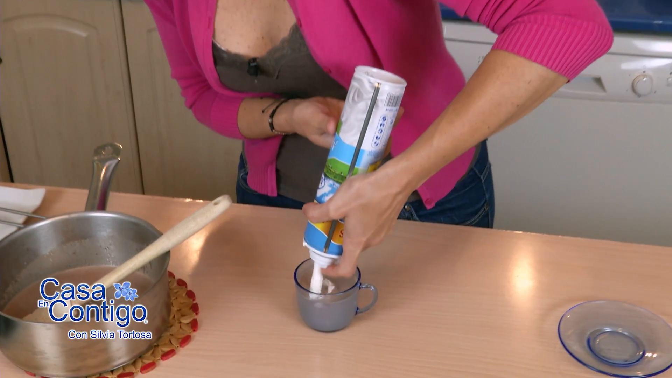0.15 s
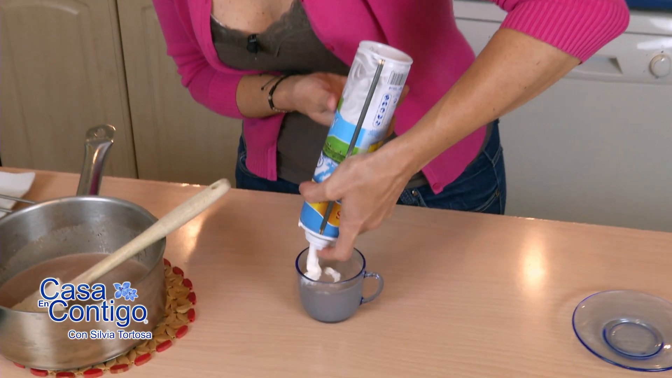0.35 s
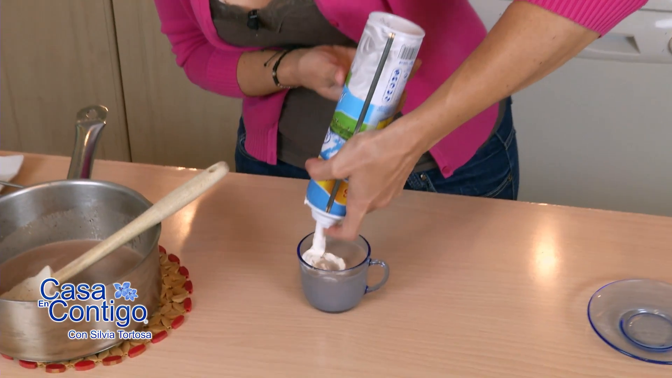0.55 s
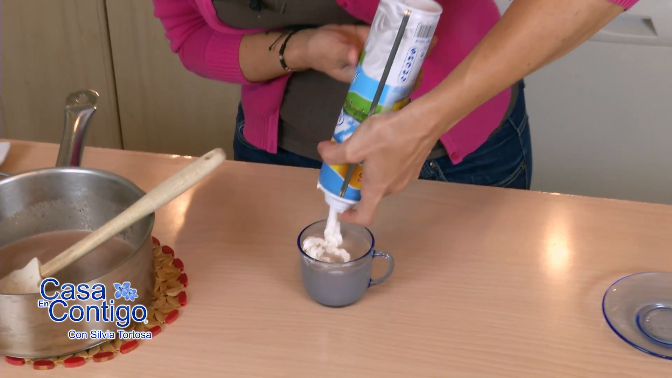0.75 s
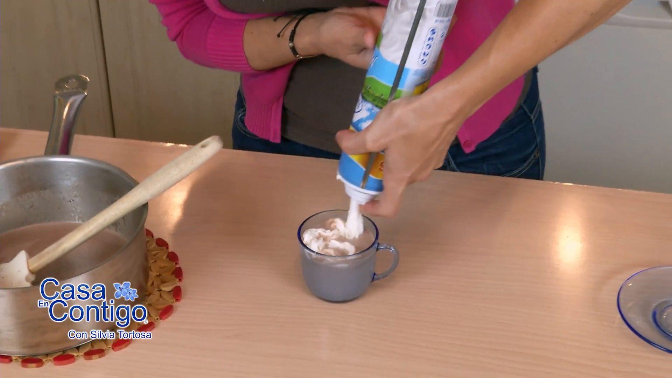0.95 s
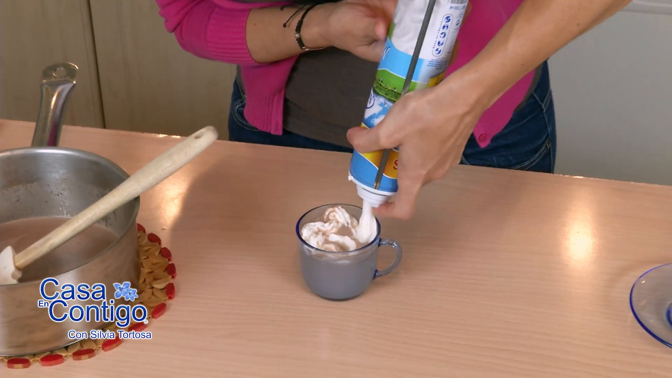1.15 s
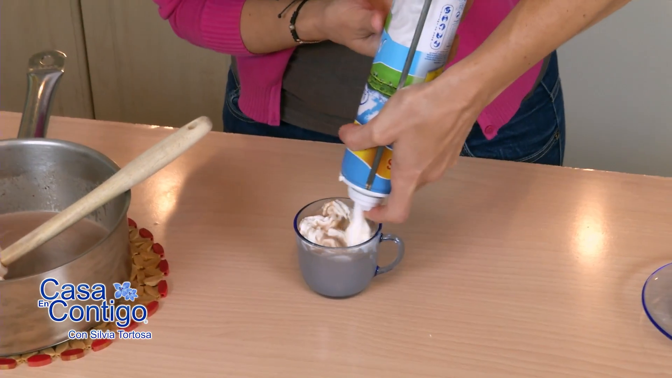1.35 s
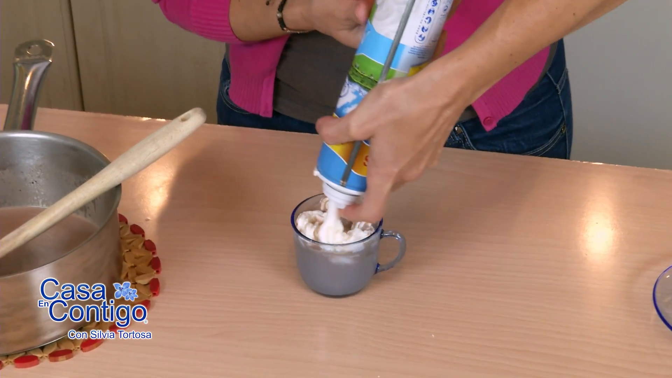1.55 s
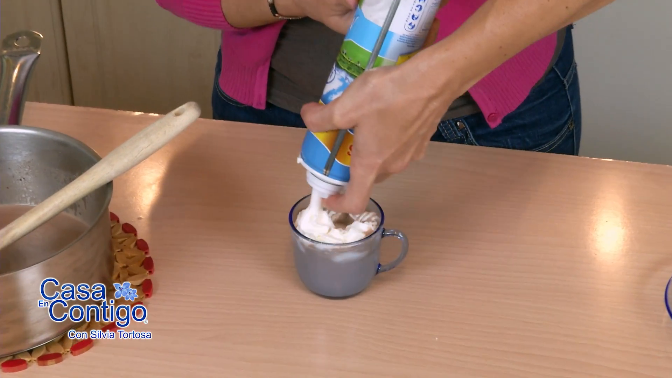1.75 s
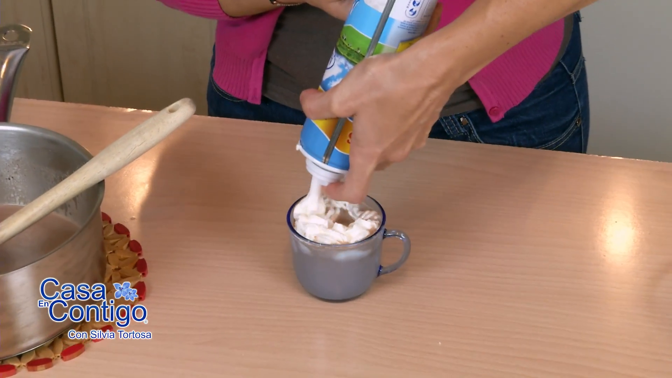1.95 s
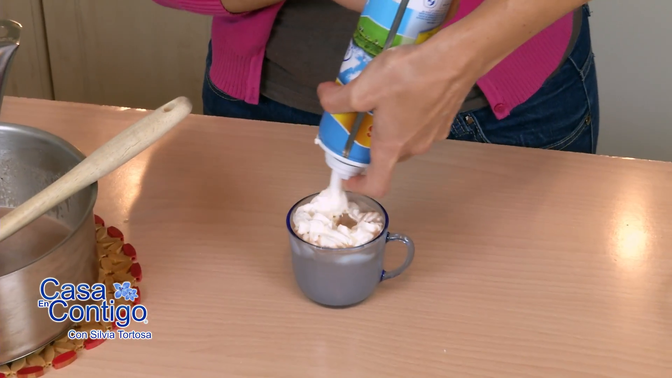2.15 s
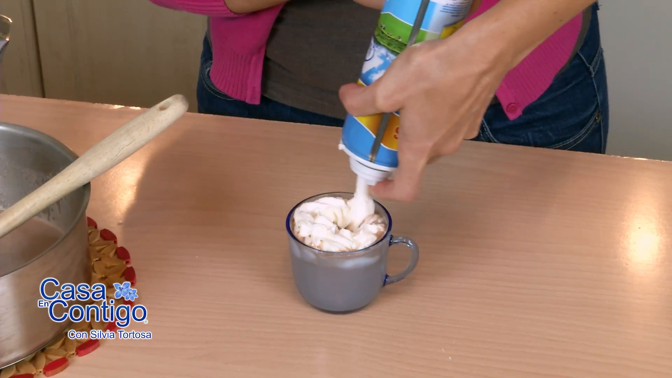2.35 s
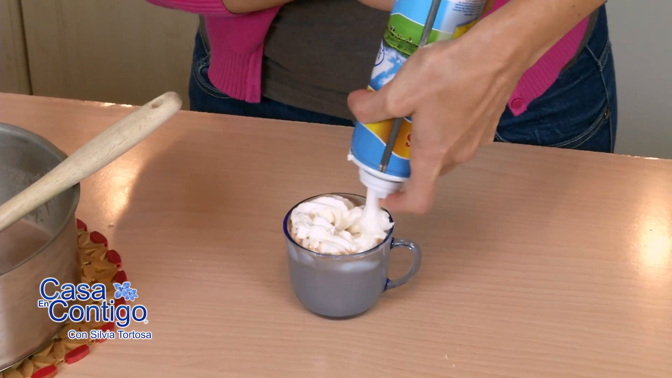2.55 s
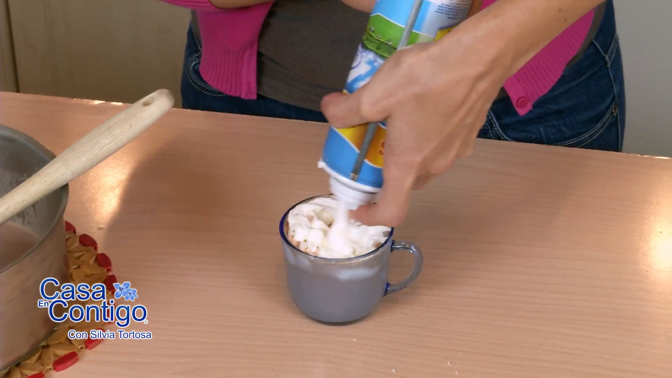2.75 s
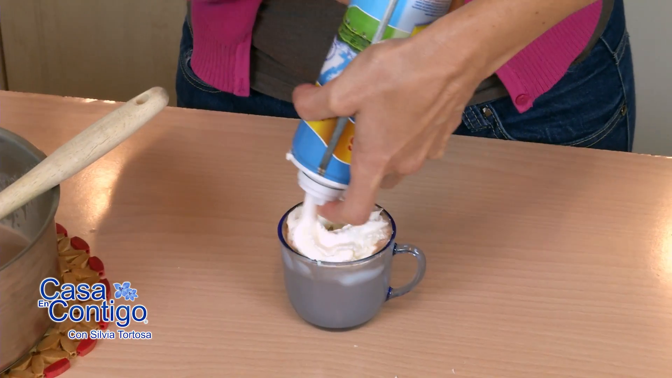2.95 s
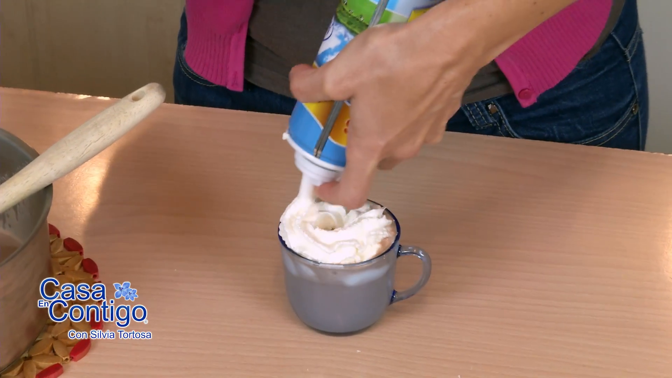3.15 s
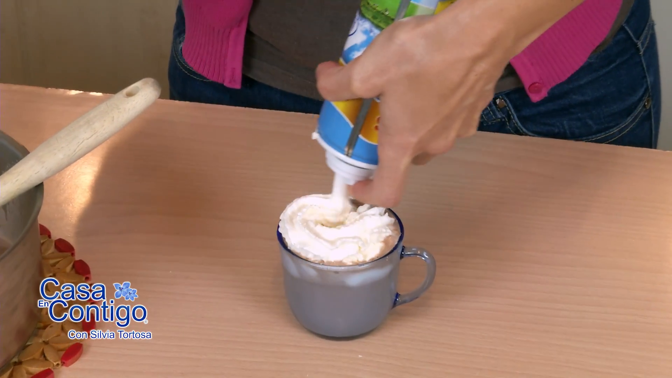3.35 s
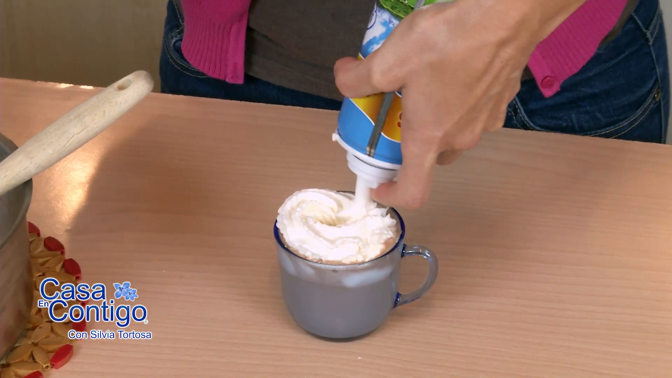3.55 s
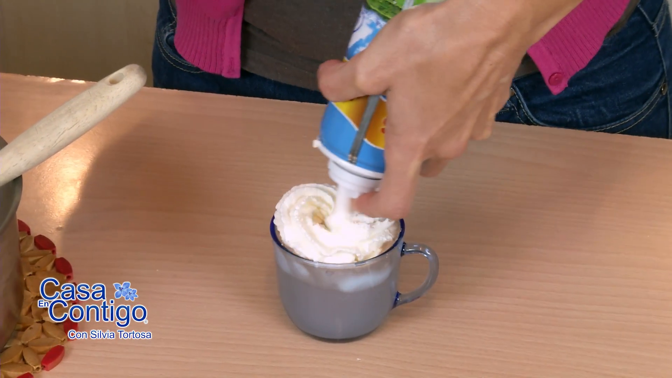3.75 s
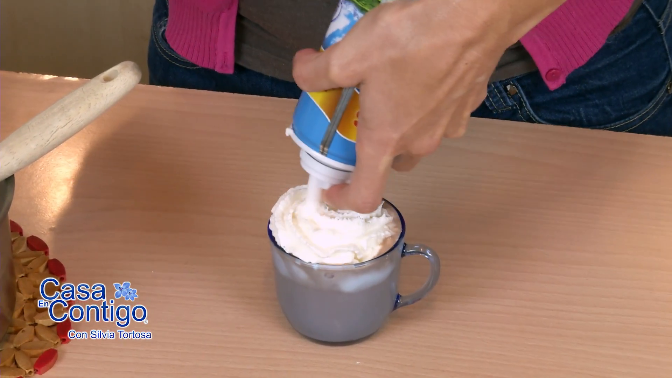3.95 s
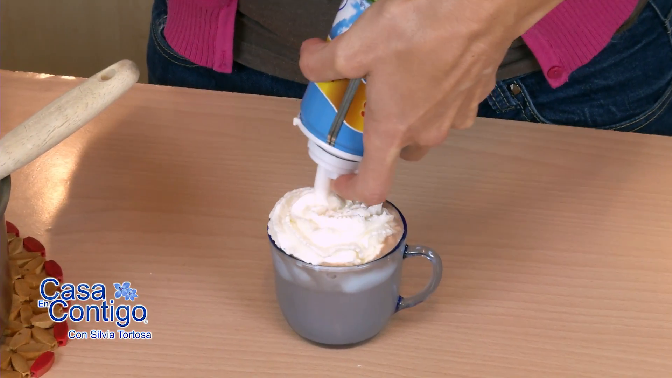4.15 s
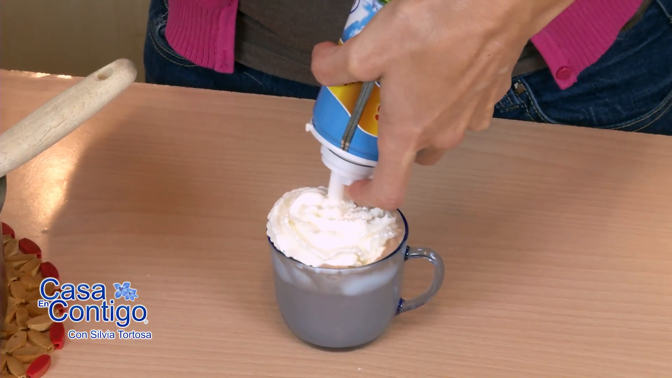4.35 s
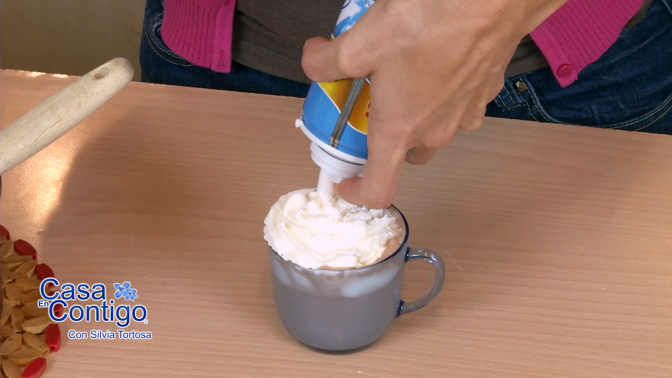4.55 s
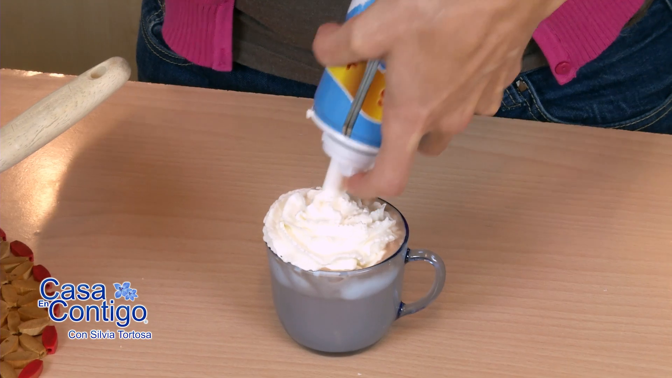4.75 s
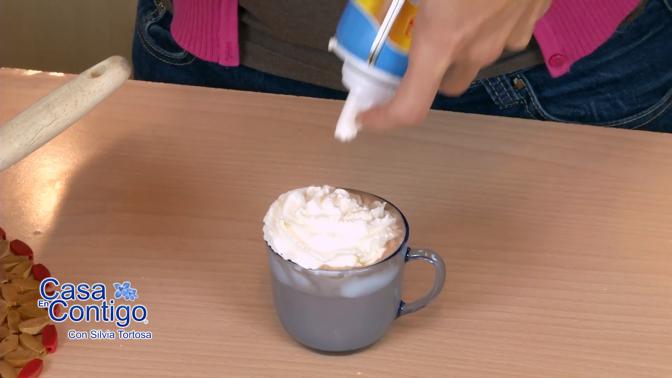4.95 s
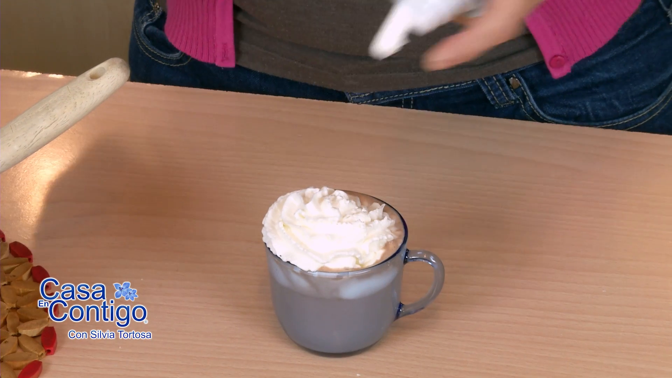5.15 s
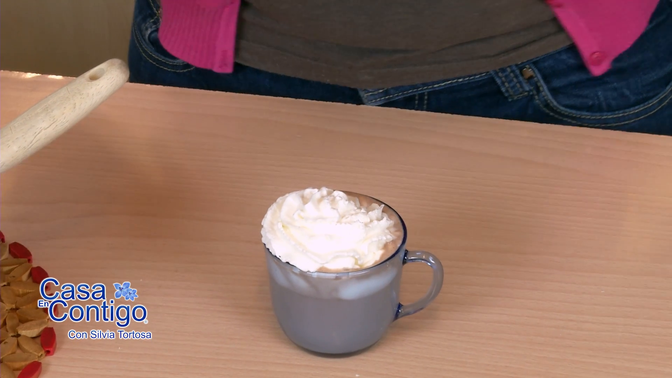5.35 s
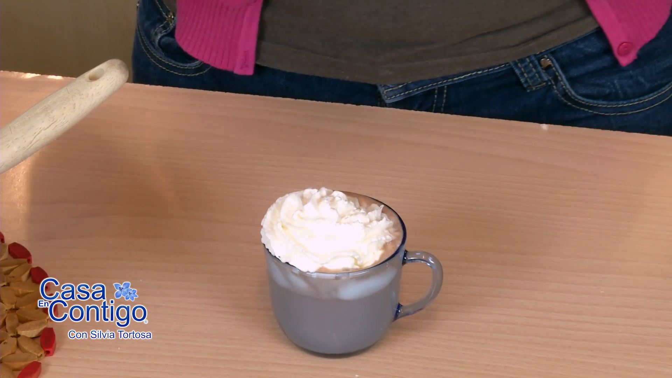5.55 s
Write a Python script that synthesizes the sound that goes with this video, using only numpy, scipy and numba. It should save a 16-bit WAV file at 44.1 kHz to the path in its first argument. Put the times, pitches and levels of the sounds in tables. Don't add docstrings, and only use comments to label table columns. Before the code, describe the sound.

A bright, bubbly, uneven gas hiss starts immediately and runs almost throughout, broken into fast spurts by foam bursting in the nozzle, with hollow metallic and ceramic-like ringing beneath. It cuts off sharply, leaving quiet kitchen air with a low fridge-like rumble, sharp little handling clicks, a small metallic knock with a low bump, and soft knit cloth swishes. Close microphone, short indoor reverberation.

```python
import sys
import numpy as np
from scipy import signal
from scipy.fft import rfft, irfft
from scipy.io import wavfile
from scipy.ndimage import uniform_filter1d
from numba import njit

SR = 44100
rng = np.random.default_rng(int(sys.argv[2]) if len(sys.argv) > 2 else 0)


def attenuation_scalar(level_db):
    decades = np.asarray(level_db, float) / 20
    return 10 ** decades


def master(y):
    cut = np.clip(np.atleast_2d(y).T, -1, 1)
    pcm = np.round(cut * 32767)
    wavfile.write(sys.argv[1], SR, pcm.astype(np.int16))


N = 246342
T = np.arange(N) / SR
SHUT_S = 4.718
LAST_GASP_S = .1
RING_SHARE = .75


def unit(x):
    return x / np.sqrt(np.mean(x ** 2))


def noise(count=N):
    return rng.standard_normal(count)


def band(x, lo_hz, hi_hz, order=2):
    edges_hz = [lo_hz, min(hi_hz, .45 * SR)]
    return signal.sosfilt(signal.butter(order, edges_hz, "band", fs=SR, output="sos"), x)


def colour(x, points):
    hz, db = np.transpose(points)
    f = np.maximum(np.arange(len(x) // 2 + 1) * SR / len(x), 1)
    return irfft(rfft(x) * attenuation_scalar(np.interp(np.log(f), np.log(hz), db)), len(x))


@njit
def svf(x, hz, width):
    y, b, l = np.empty(len(x)), 0., 0.
    for i in range(len(x)):
        g, k = np.tan(np.pi * hz[i] / SR), width / hz[i]
        v = (b + g * (x[i] - l)) / (1 + g * (g + k))
        b, l, y[i] = 2 * v - b, l + 2 * g * v, k * v
    return y


def resonance(x, hz, width_hz):
    return svf(x, np.full(len(x), float(hz)), float(width_hz))


def walk(rate):
    k = int(SR / rate)
    held = np.repeat(noise(N // k + 1), k)
    return 0.63 * uniform_filter1d(uniform_filter1d(held, k), k)[:N]


def air():
    # f/Hz, level/dB per Hz
    tone = [(8.8, -43), (15, -8), (97, -4), (767, -20), (1150, -20), (3600, -28), (4540, -23),
            (12200, -24.5), (15900, -27)]
    throb_db = 2.5 * np.cos(2 * np.pi * 5.02 * (T - 5.12))
    rumble = attenuation_scalar(-60.5 + walk(5.3) + throb_db) * unit(band(noise(), 17, 66))
    fade_db = 19 * np.maximum(T - 5.45, 0)
    return attenuation_scalar(-62.5 + 0.52 * walk(3.7) - fade_db) * unit(colour(noise(), tone)) + rumble


def room(x):
    t60_s, low_db = 0.38, -6.5
    treble_t60_s, treble_db = 0.34, -7.5
    u = T[:SR // 2]
    build = (1 - np.exp(-u / 0.007)) / np.sqrt(SR / 30)
    out = attenuation_scalar(0.5) * resonance(x, 351.6, 3)
    for turn in range(3):
        low = attenuation_scalar(low_db) * band(noise(len(u)), 43, 2700) * 1000 ** (-u / t60_s)
        high = attenuation_scalar(treble_db) * band(noise(len(u)), 1960, 16000, order=1) * 1000 ** (-u / treble_t60_s)
        share = np.cos(2 * np.pi * (1.322 + turn) * T + turn)
        out = out + signal.fftconvolve(x * share, (low + high) * build)[:N]
    return out


def sleeve():
    # middle t/s, length/s, f/Hz, level/dB
    strokes = [
        (5.132, 0.094, 7100, -59.5),
        (5.25, 0.15, 2150, -61),
        (5.28, 0.22, 11000, -67.5),
        (5.3, 0.56, 14000, -69),
        (5.484, 0.23, 890, -63.5),
        (5.44, 0.45, 230, -65.5),
    ]
    out = 0
    for s, length, hz, db in strokes:
        cloth = resonance(resonance(noise(), hz, 1.3 * hz), hz, 1.3 * hz)
        swell = np.exp(-np.abs(2 * (T - s) / length) ** 3)
        out = out + unit(cloth) * attenuation_scalar(db + 2.5 * walk(80)) * swell
    return out


def ticks():
    # t/s, peak level/dB, ring f/Hz, crack level/dB, crack f/Hz
    taps = [(4.742, -45, 2470, -83, 6000), (4.901, -53, 1210, -57, 1790), (4.9509, -37.5, 2340, -56, 14100),
            (4.9512, -59, 5560, -60, 1400), (5.0089, -44, 9000, -53, 1200), (5.009, -45, 14500, -60, 12000),
            (4.9511, -54, 7800, -60, 12200), (5.221, -56, 2400, -60, 6000), (5.0116, -50, 1150, -62, 900),
            (5.096, -51, 1190, -66, 3000), (5.2707, -62, 1500, -61, 2800), (5.3038, -49, 850, -58, 2500),
            (5.406, -52, 4140, -58, 4500), (5.457, -52, 750, -60, 1500), (5.498, -64, 3000, -66, 5000),
            (5.481, -47, 1260, -60, 1500)]
    # t/s, peak level/dB, f/Hz, t60/s
    pings = [
        (4.9511, -47, 14300, .012),
        (4.9509, -50, 5400, .006),
        (5.2678, -54, 14800, .012),
        (5.2708, -48, 14600, .006),
        (5.3045, -53, 14800, .01),
        (5.2706, -40, 2400, .012),
        (5.2708, -42, 3200, .012),
        (5.2706, -46, 900, .014),
        (5.2707, -44, 1950, .008),
    ]
    # f/Hz, level/dB, t60/s
    thud_modes = [
        (150, -37.5, 0.039),
        (98, -50, 0.055),
        (254, -43, 0.05),
    ]
    out, u = np.zeros(N), T[:3000]

    def sine(hz):
        return np.sin(2 * np.pi * hz * u)

    def add(s, sound):
        out[int(s * SR):int(s * SR) + len(u)] += sound

    for s, db, hz, crack_db, crack_hz in taps:
        decay = 1000 ** (-u * hz / 20)
        ring = decay * (sine(hz) + .5 * sine(0.45 * hz) + 0.17 * sine(1.38 * hz))
        grit = noise(len(u))
        bright = np.exp(-u / .0015) * unit(band(grit, .92 * crack_hz, 1.1 * crack_hz))
        add(s, attenuation_scalar(db) * ring + attenuation_scalar(crack_db) * (bright + .6 * np.exp(-u / .0006) * grit))
    for s, db, hz, t60 in pings:
        add(s, attenuation_scalar(db) * 1000 ** (-u / t60) * sine(hz))
    for hz, db, t60 in thud_modes:
        add(5.272, -attenuation_scalar(db) * 1000 ** (-u / t60) * sine(hz))
    return out


def pockets():
    # t/s, gurgle rise level/dB, nozzle rise level/dB, jet rise level/dB
    listed = [(0.0605, 10, 12, 9), (0.1257, 4, 7.5, 3), (0.149, 5, 9.5, 4), (0.167, 6, 10, 6),
              (0.1843, 5, 10, 5.0), (0.201, 5, 6.0, 4), (0.21, 4, 9, 2), (0.2484, 3, 6, 3.5),
              (0.2752, 5.0, 10.5, 7), (0.2854, 4.0, 9.0, 3.5), (0.3352, 4, 7, 6.5), (0.3687, 4, 3, 4.0),
              (0.3817, 4.5, 5, 7.5), (0.398, 4.0, 7.5, 7), (0.4685, -9, 3.5, 3), (0.486, 4, 4, 3),
              (0.5617, 1, 4, 5.0), (0.5767, 4, 3, 6), (0.5852, 8, 3, 7), (0.599, 6, 4.0, 6), (0.628, 2, 2, 4),
              (0.6595, 4.5, 6.5, 5.5), (0.7063, 7.0, 4, 4), (0.7206, 10, 3.5, 8.5), (0.7525, 5, 0, 4),
              (0.7754, 5, 4.5, 5.5), (0.7877, -3, 1, 7), (0.8057, 4.5, -3, 7), (0.885, 5, 4, 1),
              (0.8996, 6, 3, 4.5), (0.9155, 7, 3, 7.5), (0.9903, 5.5, 1, 7.5), (1.0358, 7.5, 5, 6.5),
              (1.065, 4.5, 6.5, 7), (1.1453, 4, 6, 6.5), (1.1565, 5.0, 6, 6), (1.171, 1, 6.0, 5.5),
              (1.21, 4.5, 8, 7), (1.3365, 5.5, 5, 5), (1.3719, 4, 5, 6.0), (1.3844, 7.5, 4, 6),
              (1.4254, 7.5, 4.5, 7), (1.4991, 5, 2, 3), (1.5452, 1, 4.5, 4.5), (1.618, 8, 9, 4.0),
              (1.6338, 3.0, 7, 2), (1.673, 5, 7.5, 4), (1.6856, 3, 5, 4), (1.7182, 5, 9, 3),
              (1.7311, 7, 6, 6),
              (1.746, 4, 10, 4), (1.7575, 2, 6, 4), (1.809, 6, 10.5, 8.5), (1.821, 5, 5, 6.5),
            (1.836, 6, 9, 6), (1.8527, -2, 5, 7), (1.865, 6.5, 4, 7), (1.899, 2, 5.5, 5.5),
            (1.913, 6.5, 3, 6.5), (2.0286, 4.5, 7, 9), (2.058, 3, 3, 5), (2.0934, 7, 7.0, 6.0),
            (2.143, 5, 6, 5), (2.166, 6.5, 8.5, 8.5), (2.228, 3, 8.5, 6.5), (2.2408, 6.5, 7, 8),
            (2.2698, 6, 6, 6.5), (2.279, 5, 2, 7), (2.3106, 6.5, 1, 9), (2.3631, 7.5, 0, 8.5),
            (2.3798, 8, 6, 6.5), (2.409, 7, 5, 6), (2.4288, 7, 9.5, 9), (2.4617, 4.5, 4, 3),
            (2.4776, -2, 4.5, 5), (2.5612, 4.5, 5, 4.0), (2.6167, 5.5, 6.5, 4), (2.649, 4, 6.5, 7.0),
            (2.6795, 2, 5.5, 7.5), (2.7388, 3, 4, 1), (2.7702, 4.5, 9, 8), (2.7986, 2, 7.5, 6.0),
            (2.828, 3, 7, 6), (2.8475, -5, 8, 2), (2.891, 6.5, 6.5, 1), (2.909, 4, 5.5, 6.5),
            (2.9876, 6, 5.5, 5), (3.0318, 6, 6, 7), (3.0842, 3.5, 7, 2), (3.1006, 10, 8.5, 7.5),
            (3.1337, 10.5, 12, 4), (3.168, 12.5, 12, 5.5), (3.1987, 9, 6, 5), (3.215, 6.5, 10.5, 7),
            (3.2344, 7, 8.0, 5), (3.2605, 5, 9.5, 4), (3.2844, 5.5, 7, 4), (3.3163, 5.5, 5, 6),
            (3.3357, 9, 11, 8), (3.3687, 11.5, 10, 9.5),
              (3.39, 6.5, 4, 6.5), (3.408, 8, 10.5, 4), (3.4362, 7.5, 13, 7.5), (3.465, 7, 8, 4),
            (3.475, 5.5, 6, 5), (3.4926, -4, 11.5, 3.5), (3.542, 4, 10, 2), (3.5592, 5, 11.5, 4),
            (3.5765, 0, 10, 4.5), (3.5928, 4.5, 5, 5), (3.6125, 4, 9.5, 2), (3.705, 2, 5, 5),
            (3.7415, -3, 12, 1), (3.7749, 3, 7, 4.5), (3.793, -4, 10.5, 3), (3.8228, 3, 8.5, 3),
            (3.8407, -6, 8, 6), (3.859, 0, 9, 6.5), (3.876, 3, 13, 7.5), (3.9076, 3.5, 7.0, 7),
            (3.9232, 3, 7.5, 5.5), (3.957, 4.5, 6.5, 4), (4.0056, 2, 5, 5.5), (4.0178, 7, 9.5, 6.0),
            (4.035, 6, 11, 9), (4.078, 6, 10, 7), (4.1204, 4.5, 11.5, 8), (4.1376, 5.5, 10, 5.0),
            (4.151, 4, 10, 6), (4.169, 3, 12, 6), (4.185, 4, 9, 1), (4.2129, 2.5, 12, 4),
            (4.2495, 2, 11.5, 2.0), (4.2634, 3, 7.5, 3), (4.2793, 4.5, 11, 5.5), (4.3007, -4, 9.5, 2),
            (4.3559, 4.5, 9, 4.5), (4.3979, 7, 8.5, 3.5), (4.413, 5, 11.5, 5.5), (4.4484, 1, 5, 3.5),
            (4.4653, 6.5, 14, 5), (4.4803, 2, 2, 6), (4.5107, 4, 10, 6), (4.5323, 2, 10, 6.5),
            (4.5456, 2, 7, 6), (4.617, 4, 11, 10), (4.6325, 4.5, 6, 7), (4.638, 0, 10.5, 7),
            (4.6506, 4, 7, 9), (4.6705, 6, 10, 11.5), (4.689, 0, -2, 8.5), (4.694, 3, 10.5, 10),
              (0.024, 5.5, 2.0, 5), (0.0778, 7.5, 4, -5), (0.1058, 1, 5.5, 1), (0.1373, 6.0, 4.5, 2),
            (0.2295, 4.5, 1, 2.0), (0.3148, -4, 3, 1.0), (0.649, 2, 3, 4), (0.6695, 3, 2, 4.0),
            (0.8336, -4, 2, 5.5), (0.845, 1, 4.5, 2), (0.859, 2, 3, 4), (0.9557, 5.5, 0, 5),
            (1.116, 3, 3, 4), (1.1289, 4.5, 2.0, 4.5), (1.181, 3.5, 1.5, 5.5), (1.2247, 0.0, 6, 3.0),
            (1.2866, 3.5, -1, -1), (1.3085, 1.0, 2, 2.0), (1.4083, -1, 5, 4), (1.4587, 3, 2.5, 1),
            (1.4836, 3.5, 2.5, 4.5), (1.525, -3, 4, 3), (1.5627, 3, 3.0, 5), (1.6, -2, 4, 3),
            (1.6557, 7, 1, 4), (1.6991, 4, 4, 2), (1.784, 5, 4, 4), (1.9391, 5, 3.5, 5), (1.996, 4.5, 3, 5),
            (2.0154, 2, 2, 2), (2.207, 6.0, 3, 1.0), (2.2534, 7, -3, 4), (2.3362, 6.5, -3, 5),
            (2.4429, 7, 6, 7), (2.5612, 0, 3, 3.5), (2.6006, -1, 4.5, 0), (2.662, 5.5, 1, 3.5),
            (2.6977, 4, 4.5, 5), (2.7293, -3, 5, 6.5), (2.9544, 5.5, -1, 3), (3.0045, -11, 5, 2),
            (3.0176, 5.5, 6, 1), (3.0497, -2, 7, 0), (3.1154, 1.0, 9, 3), (3.725, -4, 5, 1),
            (3.7555, 2, 5.5, 2), (3.938, 2, 6, 5), (4.0997, -0.5, 7, 4), (4.2354, 2, 4, 3),
            (4.4947, 4, 4.0, 5.0)]
    empty_db, full_db = 4, 6.5
    rows = [tuple(row) for row in listed]
    at, luck = np.transpose(rows)[0], rng.random((400, 4))
    stray_s = np.cumsum(.0165 * (.5 + luck[:, 0]))
    for s, (_, a, b, c) in zip(stray_s, luck):
        if s < SHUT_S - LAST_GASP_S and np.abs(at - s).min() > .011:
            nozzle_db = np.interp(s, [0, SHUT_S], [empty_db, full_db])
            rows.append((s, a * empty_db, b * nozzle_db, c * empty_db))
    return np.transpose(rows)


def bursts(times, power):
    rise_s, length_s, tail_s, tail = .0006, .0058, .006, .1
    out, u = np.zeros(N), T[:700]
    out[(times * SR).astype(int)] = power
    hold = np.exp(-(u / length_s) ** 5)
    shape = (1 - np.exp(-u / rise_s)) ** 2 * (hold + tail * np.exp(-u / tail_s))
    lead = int(np.sum(np.cumsum(shape) < shape.sum() / 2))
    return np.maximum(signal.fftconvolve(out, shape / shape.max())[lead:lead + N], 0)


def around(times, weights, shift_s, width_s):
    out, u = np.zeros(N), T[:1001] - T[500]
    out[(times * SR).astype(int)] = weights
    bump = np.exp(-((u - shift_s) / width_s) ** 2)
    return np.minimum(signal.fftconvolve(out, bump, "same"), 1)


def steadied(x, gate):
    size = int(.005 * SR)

    def relative(power):
        smooth = uniform_filter1d(uniform_filter1d(power, size), size)
        return smooth / uniform_filter1d(power, SR // 4)

    due, heard = relative(gate ** (1 + RING_SHARE / 2)), relative(x ** 2)
    inside = np.clip(uniform_filter1d(gate, size) - .5, 0, 1)
    return x * (due / heard) ** (.7 / 2 * inside)


def hollows(jet, lo_hz, hi_hz):
    # middle t/s, length/s, f/Hz, level/dB over the plain hiss
    cavities = [(0.78, 0.37, 4300, 4), (0.028, 0.088, 6600, -1), (0.02, 0.12, 1250, 18),
                (0.15, 0.17, 4050, 2), (0.3, 0.15, 4020, 14), (0.39, 0.07, 10300, -3),
                (2.1, 0.69, 2950, -2), (2.24, 0.35, 4930, 4), (2.26, 0.33, 1260, 4),
                (2.1, 1.54, 3500, -4.5), (4.25, 0.4, 2170, 5), (4.4, 0.19, 8700, 3), (4.1, 0.14, 11200, 6),
                (1.62, 0.33, 4270, -6), (0.74, 0.078, 1730, 9), (2.17, 0.42, 12400, 6),
                (1.46, 0.12, 12900, 5), (3.67, 0.11, 250, 14), (4.45, 0.23, 252, 19.5),
                (2.69, 0.16, 361, 8), (0.23, 0.37, 6550, 7), (0.33, 0.26, 9400, 2), (0.54, 0.18, 12700, 2),
                (0.64, 0.17, 11200, 10), (0.784, 0.37, 9400, 5.5), (0.9, 0.28, 12500, 5.5),
                (1.02, 1.1, 7450, 2), (1.11, 0.18, 9400, 3.5), (1.57, 0.37, 8670, 11.5),
                (1.7, 0.12, 11700, 11), (1.762, 0.094, 10600, 14), (1.85, 0.18, 9350, 6.5),
                (2.17, 0.34, 11300, 10), (2.4, 0.34, 6340, 5), (2.54, 0.51, 8520, 7.5),
                (2.48, 0.43, 9450, 5), (3.02, 0.18, 11300, 6), (3.118, 0.093, 8360, 10),
                (3.15, 0.31, 4900, 9), (3.24, 0.24, 6600, 6), (3.53, 0.26, 4810, 16), (3.67, 0.6, 8740, 1),
                (3.94, 0.42, 5800, 8.5), (3.91, 0.17, 11000, 8), (4.434, 0.21, 5750, 9),
                (3.9, 0.12, 7950, -2), (4.67, 0.1, 8100, 6), (4.645, 0.12, 6270, 10),
                (0.91, 0.14, 1340, 14), (3.2, 0.28, 1300, 3)]
    out = np.zeros(N)
    for s, length, hz, db in cavities:
        if .9 * lo_hz < hz < 1.1 * hi_hz:
            span = slice(max(int((s - length) * SR), 0), int((s + length) * SR))
            swell = np.exp(-(2 * (T[span] - s) / length) ** 2)
            out[span] += attenuation_scalar(db) * swell * resonance(jet[span], hz, 0.082 * hz)
    return out


def tube_modes(blast, lo_hz, hi_hz, fill, sunk_db):
    # f/Hz, width/Hz, level/dB over the plain hiss, level change/dB as the mug fills
    modes = [(169, 38, -4.5, 28), (255, 32, 2.5, 3), (364, 100, 0.5, 14), (473, 68, 0.5, 1),
             (972, 32, 3, -4), (1260, 270, 6.5, -11), (1722, 120, -2.5, -29), (2387, 245, 1.5, -1),
             (3030, 170, -6, -13), (4174, 320, 8, 15), (6620, 100, 4, 3), (8490, 240, -8.5, 25)]
    out = np.zeros(N)
    for hz, width, db, change_db in modes:
        if .8 * lo_hz < hz < 1.2 * hi_hz:
            sunk_ring_db = (hz > 3500) * 0.93 * sunk_db
            level = attenuation_scalar(db + change_db * fill + sunk_ring_db + walk(5.1))
            out += level * svf(blast, hz * (1 + walk(5.79) / 70), 1. * width)
    return out


def spray():
    # low f/Hz, high f/Hz, share of a spit's rise 0-2, flicker level/dB
    zones = [
        (123, 684, 0.17, 2.5),
        (850, 3460, 0.98, 1),
        (3000, 5680, 0.94, 0.5),
        (6000, 9490, 1.06, 1),
        (9800, 14100, 0.84, 2),
        (13600, 23000, 0.78, 0),
    ]
    # level/dB, share of flow, of sinking, of dryness, level change/dB as the mug fills
    follow = [
        (-43, 0.77, -0.25, 0.42, -4),
        (-41.5, 0.36, -0.97, 0.0092, 3),
        (-36, 1.1, 1.25, 0.011, 0.1),
        (-35.5, 1.91, -1.43, 0.01, -5),
        (-36.5, 1.33, -0.045, 0.53, -11),
        (-41.5, 1.5, -0.18, 0.46, -10),
    ]
    # t/s, flow level/dB, nozzle sunk in foam/dB, dryness of the gas/dB
    hand = [(0.045, -11.5, -3, -4.5), (0.08, -4.5, -0.5, -17.5), (0.325, -6.5, -1.5, -4),
            (0.575, -2.5, -0.5, 0.5), (0.7, -1, 0, 3.5), (0.95, -0.6, -1.5, 8), (1.075, -1.5, -2.5, 0.5),
            (1.325, -1, 0, 2), (1.7, 1.5, 2.5, 1), (1.95, -1, -0.5, 4), (2.325, 1.5, -2, -2),
            (2.575, -0.5, -0.5, 4), (2.825, 1, 0.9, -3), (3.075, 0.7, 0.1, -2), (3.325, -1, -1.5, -3.5),
            (3.7, -1, 0, -0.5), (4.15, 0, 0.5, -1.5), (4.72, -1.34, -1.5, 6.5)]
    # f/Hz, level/dB per Hz
    tilt = [(59, -44), (100, -12), (357, -8.5), (704, -10), (1250, -5.5), (1910, -2.5), (4180, -1.5),
            (5390, 0), (8600, 3.5), (12300, 4.5), (15900, 1.5)]
    s, *controls = np.transpose(hand)
    flow, sunk_db, dryness = (np.interp(T, s, c) for c in controls)
    fill = T / SHUT_S - .5
    levels_db = np.array(follow) @ [np.ones(N), flow, sunk_db, dryness, fill]
    at, gurgle_db, nozzle_db, jet_db = pockets()
    rises_db = [gurgle_db, gurgle_db, nozzle_db, jet_db, jet_db, jet_db]

    size = np.clip(np.maximum(nozzle_db, jet_db) / 8, 0, 1)
    plug_db = -3.5 * around(at, size, -.007, .003)
    pop_db = 6.5 * around(at, size, -.003, .0014)
    clear_db = -13 * around(at, size, .0017, .0024)
    small = walk(125)
    crackle_hz = 330
    crackle = walk(crackle_hz)
    gasp = np.clip((SHUT_S - T) / LAST_GASP_S, .05, 1)
    out = 0
    for (lo_hz, hi_hz, share, flicker_db), db, rise_db in zip(zones, levels_db, rises_db):
        crackle_db = (lo_hz > 2000) * 4.5 * (crackle + walk(crackle_hz))
        gate = attenuation_scalar(1.3 * share * small + 2 * flicker_db * walk(40) + 2 * plug_db + crackle_db)
        burst_db = rise_db + .6 * noise(len(at))
        lead_s = (lo_hz < 1000) * 0.0018
        gate = gate + bursts(at - lead_s, np.maximum(attenuation_scalar(2 * share * burst_db) - 1, 0))
        gate = gate / uniform_filter1d(gate, SR // 6)

        jet = noise() * np.sqrt(gate)
        blast = jet * gate ** (RING_SHARE / 2) * gasp
        rung = jet + tube_modes(blast, lo_hz, hi_hz, fill, sunk_db) + hollows(blast, lo_hz, hi_hz)
        rung = band(colour(rung, tilt), lo_hz, hi_hz)
        if lo_hz > 700:
            rung = steadied(rung, gate)
        else:
            rung = band(rung * attenuation_scalar(pop_db + clear_db), lo_hz, 2 * hi_hz)
        out = out + attenuation_scalar(db) * rung / np.sqrt(uniform_filter1d(rung ** 2, SR // 4))
    out = out - 0.35 * resonance(out, 1910, 177)
    return out * np.exp(-np.maximum(T - SHUT_S, 0) / .013)


def scene():
    can, hands = spray(), ticks() + sleeve()
    return (attenuation_scalar(0.51) * can + hands + room(can + hands / 3) + air())[None]


def band_limit(x):
    return signal.sosfilt(signal.butter(12, 16340, fs=SR, output="sos"), x)


def record(dry):
    top_cut = signal.ellip(12, .1, 75, 15700, fs=SR, output="sos")
    return band_limit(signal.sosfiltfilt(top_cut, dry))


dry = scene()
out = record(dry)
master(out)
```